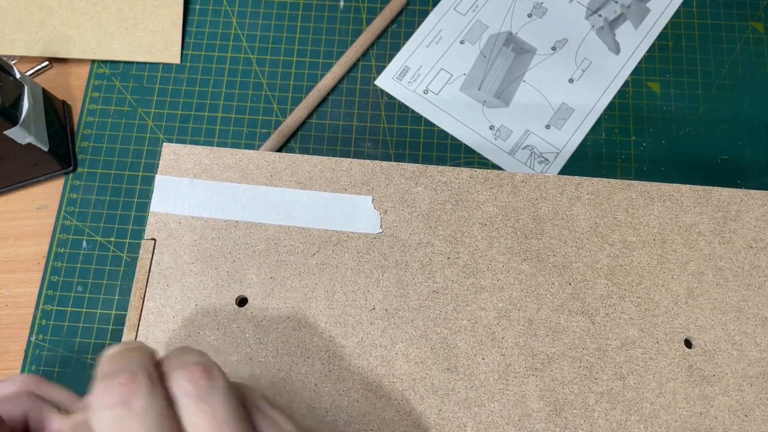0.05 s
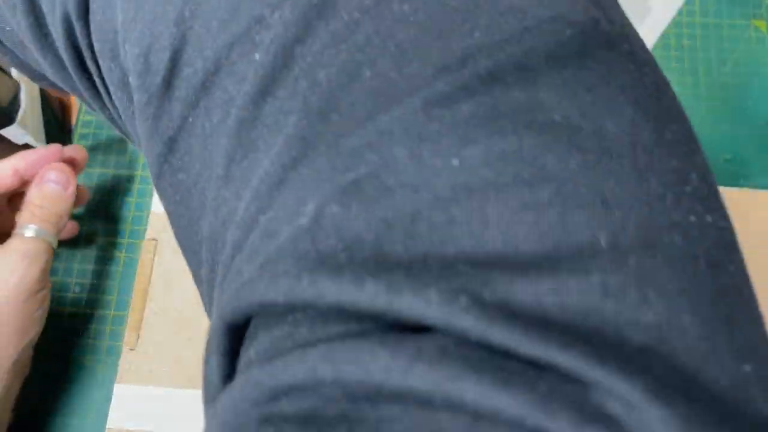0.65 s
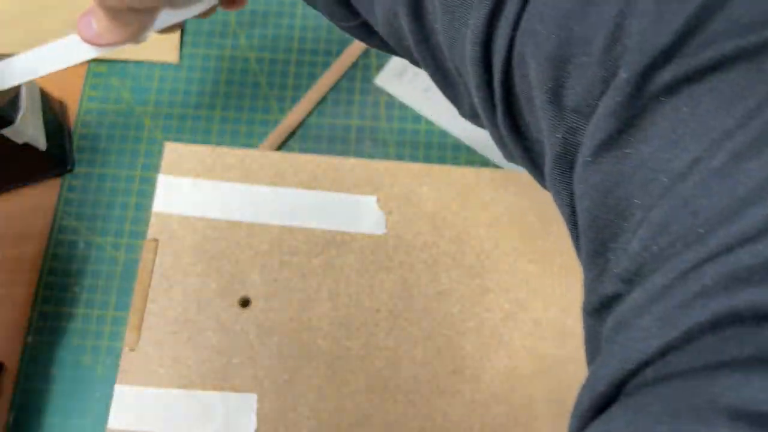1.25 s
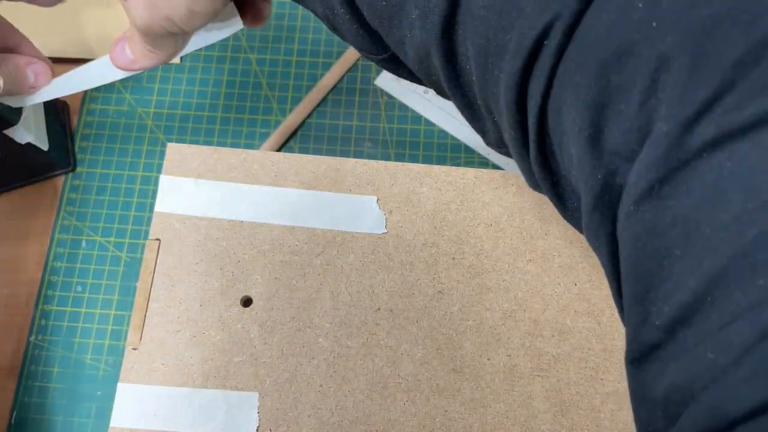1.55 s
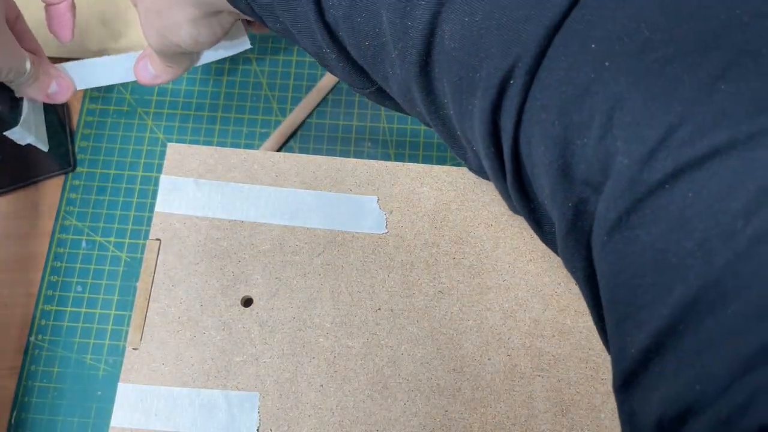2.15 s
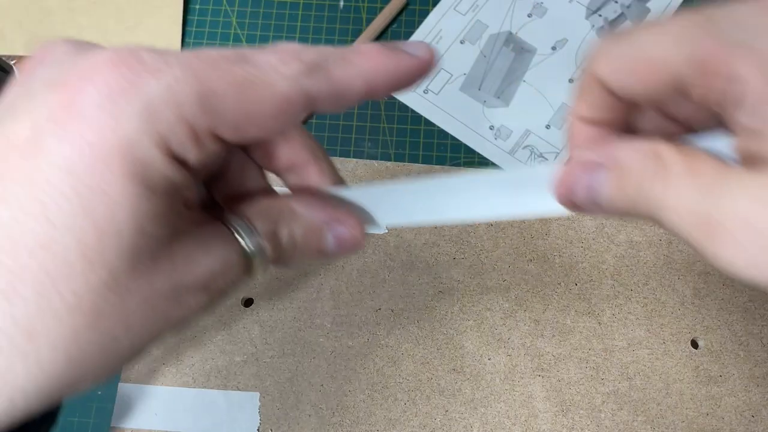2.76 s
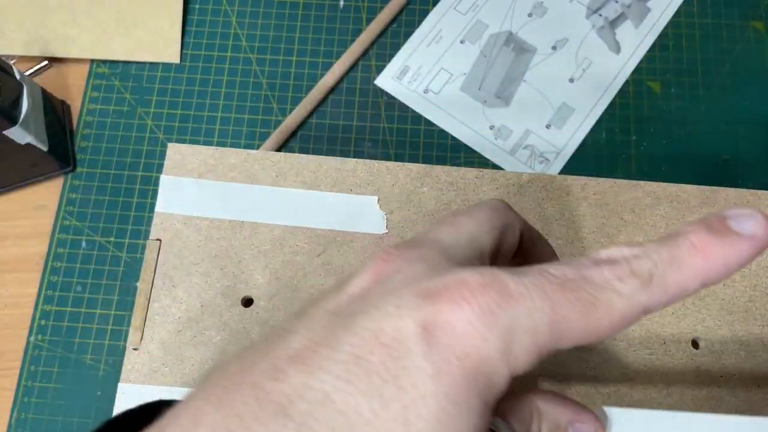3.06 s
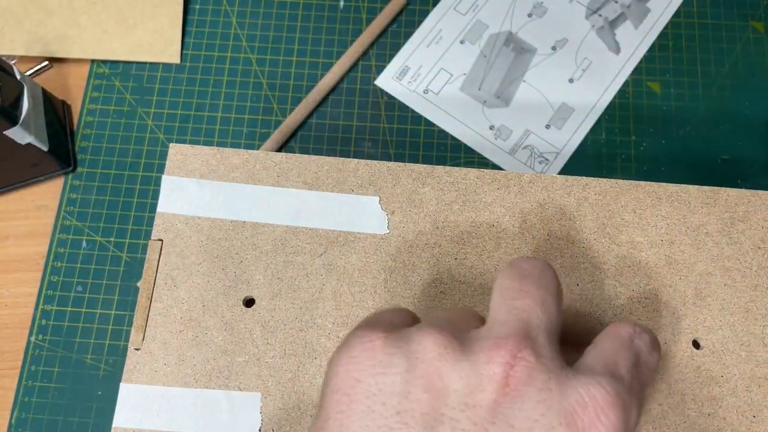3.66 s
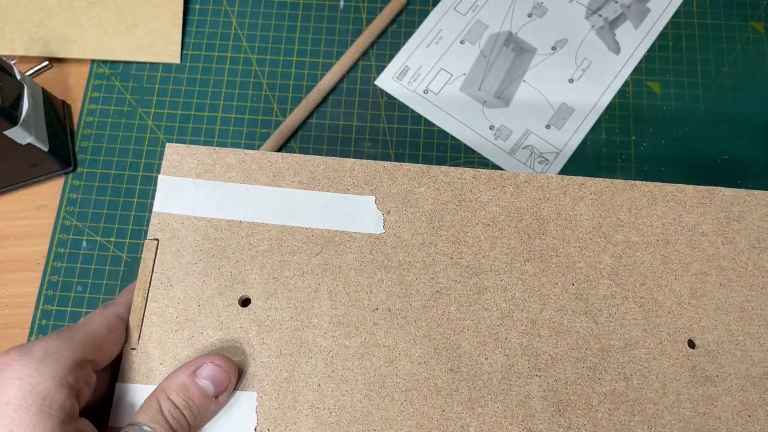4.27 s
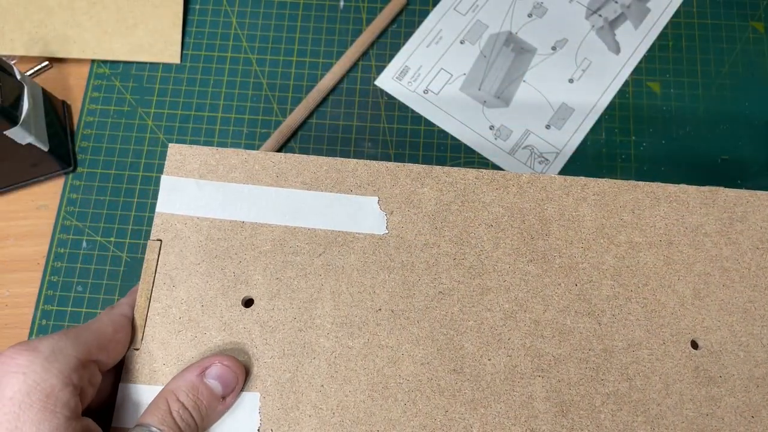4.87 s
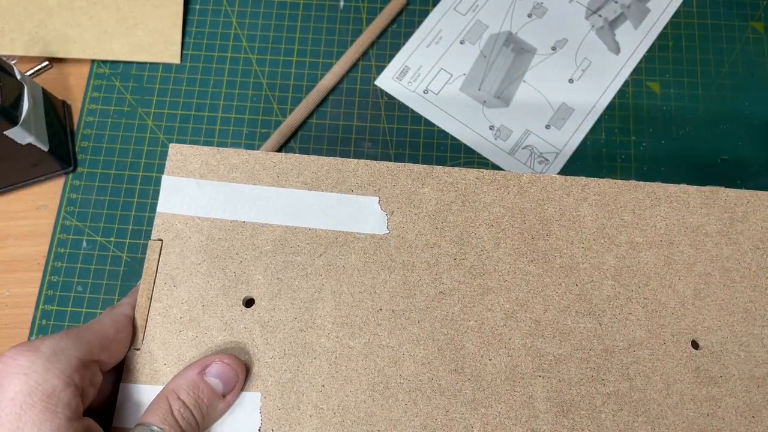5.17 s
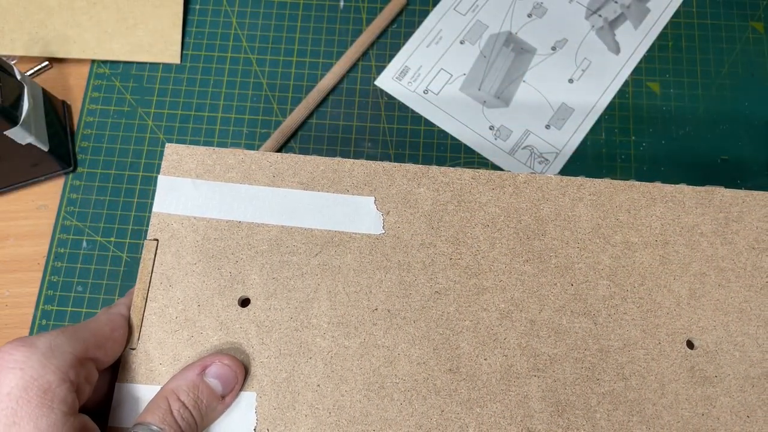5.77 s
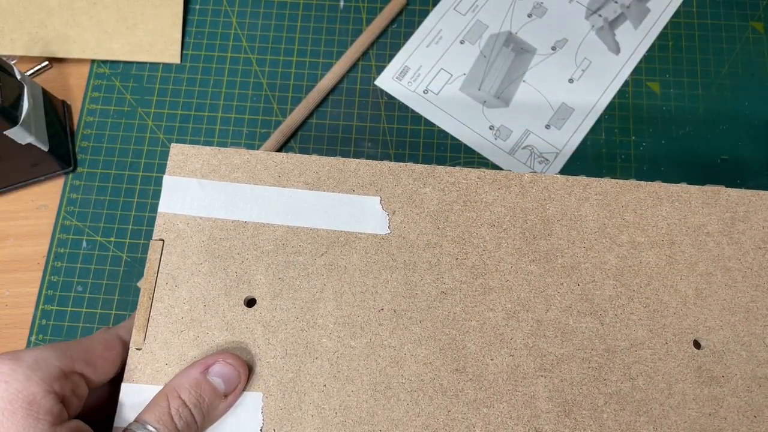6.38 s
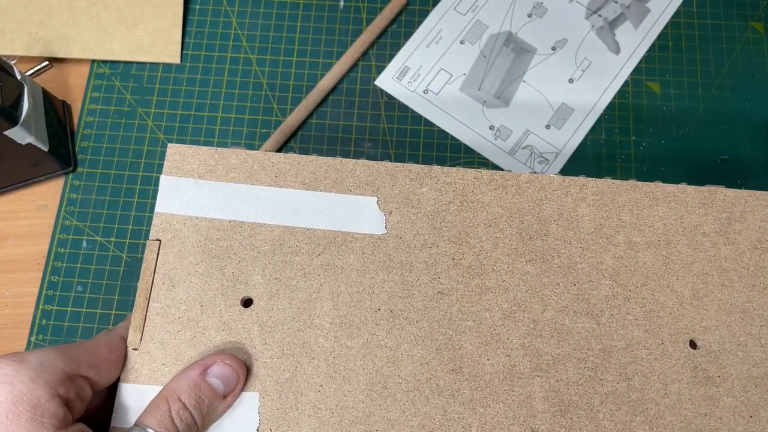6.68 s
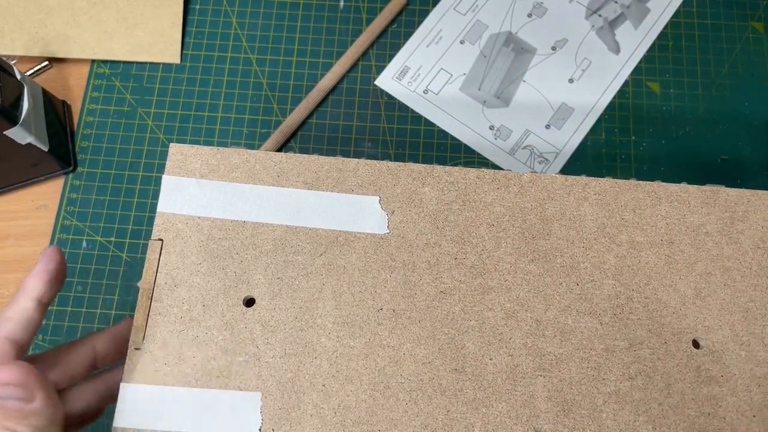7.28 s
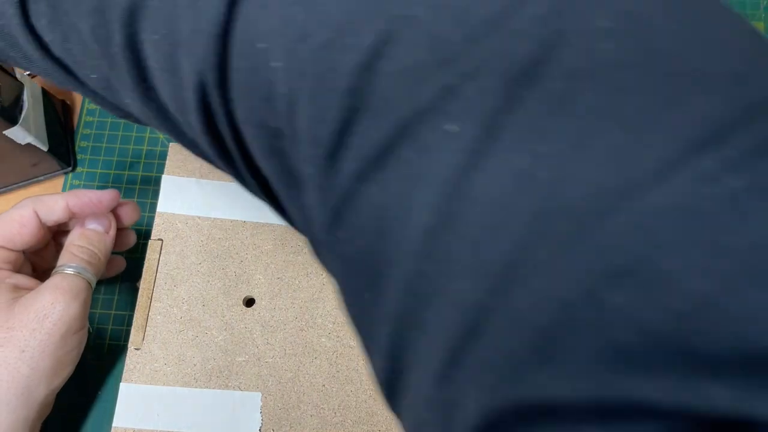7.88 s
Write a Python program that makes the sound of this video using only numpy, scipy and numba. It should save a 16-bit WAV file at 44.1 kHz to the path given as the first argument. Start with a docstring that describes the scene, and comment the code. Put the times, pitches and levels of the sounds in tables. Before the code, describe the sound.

Close, crackly peeling and snapping of masking tape, followed by light knocks on a wooden board and faintly squeaky thumb rubbing.

```python
"""Masking tape is peeled off its roll, torn off, snapped taut and rubbed onto a thin wooden panel on a desk.
The glue lets go in tiny bursts, paper fibres rip, the cardboard roll rings, the panel knocks and the
desk thuds. Fingernails click on the board and a sleeve brushes past the microphones.
Heard close up in a small quiet room, from a phone's stereo pair just above the work."""
import sys
import numpy as np
from scipy import signal
from scipy.fft import rfft, irfft, next_fast_len
from scipy.io import wavfile
from scipy.ndimage import uniform_filter1d, map_coordinates
from numba import njit

SR = 44100
rng = np.random.default_rng(int(sys.argv[2]) if len(sys.argv) > 2 else 0)


def generate_wav(sig):
    """Save sig (samples, or channels by samples) to the path in sys.argv[1] as 16-bit PCM at SR."""
    pcm = np.round(np.clip(np.atleast_2d(sig).T, -1, 1) * 32767).astype(np.int16)
    wavfile.write(sys.argv[1], SR, pcm)


N = 354123
T = np.arange(N) / SR

# bands in which noise levels are set: low_hz, high_hz
BASS, LOW, MID = (60, 140), (200, 700), (400, 2000)
HISS, TREBLE, ALL = (3000, 7000), (9300, 12300), (0, 16000)
# spectrum of the panel under friction: frequency_hz, level_db
PANEL_COLOUR = [(60, -30), (170, 9), (260, 2.5), (450, 3.5), (700, -12), (1000, -16.5), (2000, -18),
                (4000, -30.5), (12000, -33)]
# spectrum of the shaken desk: frequency_hz, level_db
DESK_COLOUR = [(25, -34.5), (55, -13), (78, 7), (103, 10.5), (140, -7.5), (300, -22), (1500, -61.5)]


def peel(judder_db=2.2, echo_gain=.42, rasp_db=-41.5, ring_db=-40, rumble_db=-21):
    """Glue threads break in flurries; the lengthening strip rings and buzzes and the desk rumbles."""
    # speed of the tape leaving the roll, as the level of its crackle: time_s, level_db
    peel_speed = [(.73, -70), (.75, -44.5), (.79, -40.5), (.86, -37), (.96, -36.5), (1.07, -38), (1.1, -40),
                  (1.2, -44), (1.268, -45), (1.29, -80)]
    # spectra of the parting glue and the rasping strip: frequency_hz, level_db
    glue_colour = [(200, -10), (600, -22), (1100, -15.5), (1500, -16.5), (2700, -19), (6000, -20.5),
                   (9000, -5), (11500, -3), (15000, -8.5)]
    strip_colour = [(1000, -18.5), (2700, -4.5), (3300, -5.5), (4200, -1.5), (5400, -2), (7000, 6),
                    (9000, -12.5), (15000, -34)]
    # the free strip rings lower as it lengthens: time_s, pitch_hz
    ring_pitch = [(.75, 7450), (.86, 6500), (.92, 5500), (.97, 4960), (1.03, 4040), (1.08, 3480),
                  (1.29, 2950)]
    # a lower buzz comes and goes with the strip's tension: time_s, pitch_hz, level_db
    strip_buzz = [(.85, 3700, -61), (.895, 3470, -51), (.91, 3210, -43), (.94, 3370, -50), (.96, 3610, -57),
                  (1.0, 3400, -51), (1.06, 3300, -50), (1.1, 3400, -73)]
    speed = gain_curve(peel_speed)
    effort = speed / speed.max()
    grip = undb(judder_db * wander(550))
    grip /= np.sqrt(np.mean(grip ** 2))
    lag_s = np.interp(T, [peel_speed[0][0], peel_speed[-1][0]], [.000635, .00073])

    def hollow(slips):
        """Each slip returns inverted from the held end of the strip, later as the strip grows."""
        echo = map_coordinates(slips, [(T - lag_s) * SR], order=3)
        return (slips - echo_gain * echo) / np.hypot(1, echo_gain)

    glue_slips = hollow(grip * crackle(rate_hz=2600, spread_db=2.5, decay_s=.0004))
    glue = coloured(glue_slips, glue_colour, TREBLE) * speed
    strip_slips = hollow(grip * crackle(rate_hz=2700, spread_db=1, decay_s=.00054))
    strip = coloured(strip_slips, strip_colour, HISS)
    ring = resonance(strip, np.interp(T, *np.transpose(ring_pitch)), width_hz=900.)
    time_s, buzz_hz, buzz_db = np.transpose(strip_buzz)
    buzz = resonance(strip, np.interp(T, time_s, buzz_hz), width_hz=290.)
    rasp = strip * undb(rasp_db) * effort ** 1.14 + ring * undb(ring_db) * effort ** 2.6
    rasp += buzz / buzz.std() * gain_curve(np.column_stack([time_s, buzz_db]))
    rumble = desk_rumble() * speed * undb(rumble_db)
    return place(glue, pan_db=4.5, lead_s=.00012) + place(rasp, pan_db=-3, lead_s=-.000038) + rumble


def rips():
    """Paper fibres part in quick runs until the tape gives way; gentle tugs swell and fade."""
    # short rips of paper and glue: start_s, length_s, level_db, rise_db
    tears = [(0.611, 0.056, -45.5, 20.5), (0.74, 0.063, -37.5, -1), (1.293, 0.025, -53, 15),
             (1.347, 0.018, -59, -1.5), (2.089, 0.043, -41, 0.5), (2.508, 0.025, -51, 8),
             (2.841, 0.04, -41.5, 16), (7.964, 0.073, -42.5, 3)]
    # tugs that free a little more tape: start_s, length_s, level_db
    tugs = [(1.469, 0.096, -55.5), (1.573, 0.048, -46), (1.624, 0.11, -53.5), (1.78, 0.054, -55)]
    # spectrum of tearing paper: frequency_hz, level_db
    rip_colour = [(200, -12.5), (600, -17.5), (1500, -5.5), (2200, -8.5), (3200, -9), (6000, -8),
                  (9000, -2), (11500, 1.5), (15000, -5.5)]
    pull = np.zeros(N)
    for start_s, length_s, level_db, rise_db in tears:
        add(pull, start_s, undb(level_db + rise_db * np.linspace(-.5, .5, int(length_s * SR))))
    for start_s, length_s, level_db in tugs:
        add(pull, start_s, undb(level_db) * np.sin(np.linspace(0, np.pi, int(length_s * SR))))
    fibres = coloured(crackle(rate_hz=1100, spread_db=1, decay_s=.0013), rip_colour, ALL)
    return place(fibres * uniform_filter1d(pull, size=256), pan_db=-6, lead_s=.00002)


def snaps(decay_s=.00022, flutter_db=-21, flutter_s=.006):
    """The strip jerks taut: a sharp crack, then a brief papery flutter."""
    # single snaps of the strip: start_s, peak_db, body_db, left_minus_right_db
    jerks = [(.629, -27.5, -19, 22), (0.675, -24, 0, 14.5), (0.7455, -30, 3, 11), (.861, -23, -11, 6),
             (.882, -27.5, -17, 3), (1.067, -21.5, -9, -4), (1.147, -30, -6, 4), (1.259, -26, -2, -4),
             (1.307, -29, -1, 17), (1.35, -34.5, -8, 17), (1.894, -24, 4.5, -9.5), (2.096, -25.5, -2, 1),
             (2.121, -27, -6, 21.5), (2.1268, -22, 6, -4.5), (2.5309, -24, 3, 1), (2.804, -43, -6.5, 23),
             (2.851, -29.5, -11.5, 7), (2.868, -22.5, -5, -9), (2.878, -25, 3.5, 1), (3.0225, -1.5, 1, -7),
             (7.988, -18, -5, 9), (8.002, -21, -12, 2), (8.015, -21.5, 5, 14)]
    # spectra of the bright crack and the duller paper body: frequency_hz, level_db
    crack_colour = [(200, -34.5), (2200, -26), (3800, -11), (6000, -0.5), (9000, 12), (11500, 9),
                    (15000, 1)]
    body_colour = [(150, -29), (500, -20), (850, -7.5), (1250, 0.5), (1700, -1), (2300, -7.5), (3000, -3),
                   (5000, 3), (6500, 0.5), (10000, -14), (15000, -16.5)]
    out, t = np.zeros((2, N)), T[:2048]
    envelope = np.exp(-t / decay_s) + undb(flutter_db) * np.exp(-t / flutter_s)
    bright, dull = response(crack_colour), response(body_colour)
    for start_s, peak_db, body_db, pan_db in jerks:
        crack = signal.fftconvolve(burst(envelope), bright + undb(body_db) * dull)
        add(out, start_s, panned(at_peak(crack, peak_db), pan_db))
    return out


def rubbing(attack_s=.028, release_s=.029, squeak_split_hz=95, grain_db=1):
    """Skin catches on crepe paper: it hisses, squeaks on two close resonances and stirs the panel."""
    # a thumb presses the tape down: start_s, length_s, panel_db, squeak_db, hiss_db, change_db
    rubs = [(5.64, 0.024, -67, -79, -61, -4), (5.688, 0.15, -58.5, -59.5, -64.5, 4),
            (5.86, 0.09, -61, -59.5, -68, 11), (5.935, 0.098, -67.5, -56.5, -65.5, -8.5),
            (5.98, 0.12, -68, -81, -74, 2), (6.415, 0.13, -78.5, -80, -69.5, 1),
            (6.558, 0.14, -70.5, -69.5, -59.5, -15), (6.7, 0.058, -77, -79, -76.5, 3.5),
            (6.82, 0.26, -79.5, -88.5, -85.5, -14), (6.987, 0.14, -65, -68.5, -66.5, 1.5),
            (7.13, 0.15, -62, -69.5, -69, 2), (7.3, 0.11, -67.5, -71, -85, -6)]
    # the squeak sinks as the thumb leaves the panel: time_s, pitch_hz
    squeak_pitch = [(5.7, 1520), (5.95, 1430), (6.6, 1506), (7.02, 1476), (7.35, 980)]
    # spectra of the rubbed panel and the skin's hiss: frequency_hz, level_db
    body_colour = [(100, 3.5), (450, 14.5), (680, 4.5), (850, 5.5), (1000, -2), (1120, -11), (1550, -8.5),
                   (2200, -31), (6000, -56)]
    hiss_colour = [(400, -5), (850, 8.5), (1150, -6), (2200, -2.5), (3000, 6.5), (3900, 0), (5000, 5.5),
                   (7000, 8), (10000, 10), (12500, 4.5), (15000, 0)]
    # resonances of the rubbed tape and panel: pitch_hz, width_hz, level_db
    rub_modes = [(860, 58, 8.5), (2140, 290, -1), (2875, 150, -5.5), (3955, 200, 3.5), (4530, 300, 2)]
    panel_gain, squeak_gain, hiss_gain = (strokes(rubs, attack_s, release_s, k) for k in (2, 3, 4))
    catches = crackle(rate_hz=1100, spread_db=1.5, decay_s=.0034)
    slips = crackle(rate_hz=4600, spread_db=5, decay_s=.00066)
    pitch_hz = np.interp(T, *np.transpose(squeak_pitch))
    squeak = sum(steep_band(slips, pitch_hz + side * squeak_split_hz, width_hz=150.) for side in (-1, 1))
    body = coloured(catches, body_colour, LOW) * panel_gain + squeak / squeak.std() * squeak_gain
    grain = roaming(crackle(rate_hz=640, spread_db=5.5, decay_s=.0021), rub_modes) * undb(grain_db)
    hiss = (coloured(catches, hiss_colour, HISS) + grain) / np.hypot(1, undb(grain_db)) * hiss_gain
    return place(body, pan_db=-2.5, lead_s=-.00018) + place(hiss, pan_db=-5.5, lead_s=-.000035)


def roaming(x, modes, rate_hz=11, swell_db=4, drift=.02):
    """Resonances that swell, fade and drift as the point of contact moves; rms 1."""
    out = np.zeros(N)
    for pitch_hz, width_hz, level_db in modes:
        ring = resonance(x, pitch_hz * (1 + drift * wander(rate_hz)), float(width_hz))
        out += ring * undb(level_db + swell_db * wander(rate_hz))
    return out / out.std()


def roll_knocks():
    """The cardboard roll rings when bumped, close to the left microphone."""
    # blows on the roll: start_s, peak_db, contact_s
    blows = [(1.894, -37.5, 0.00015), (2.105, -40, 0.00036), (2.1205, -39, 0.00014), (2.126, -24, 0.000078),
             (2.132, -32, 0.00013), (2.147, -42.5, 0.00009), (7.971, -50, .00017), (7.989, -40, 0.00023),
             (8.0145, -47, 0.00011)]
    # modes of the roll: pitch_hz, level_db, t60_s
    modes = [(495, -29, .05), (1230, -21, .012), (1870, -6, .014), (1935, 0, .025), (2080, -5, .011),
             (2525, -22, .02)]
    return place(knocks(blows, modes), pan_db=6, lead_s=.00003)


def panel_knocks(tap_db=-17, tap_decay_s=.0034):
    """A fingertip meets the thin panel: a short woody crack ahead of each ring."""
    # blows on the panel: start_s, peak_db, contact_s
    blows = [(2.877, -37.5, 0.00087), (3.022, -42, 0.0021), (3.101, -49, 0.00077), (3.5445, -30.5, .00025),
             (4.5375, -28.5, 0.0026), (5.351, -47, 0.0025), (5.393, -45.5, 0.0019), (5.514, -40, 0.00044),
             (5.5175, -40.5, 0.0017), (6.15, -51.5, 0.0017), (7.878, -41.5, 0.00035)]
    # modes of the panel: pitch_hz, level_db, t60_s
    modes = [(191, -21, 0.1), (245.7, 0, 0.017), (366, 3, .015), (400, -10, 0.039), (460, -18, 0.099),
             (590, -2.5, 0.0091), (855, -2, 0.025), (1115, -10.5, .015), (1484, -5.5, 0.011),
             (2347, -13, 0.028), (3496, 2, 0.028), (3900, -7, .025), (4670, -9, .02)]
    # spectrum of the fingertip's crack: frequency_hz, level_db
    tap_colour = [(200, -3.5), (500, -2), (850, 1.5), (1400, -8.5), (2200, -18), (4000, -21),
                  (12000, -33.5)]
    out, t = knocks(blows, modes), T[:2048]
    for start_s, peak_db, _ in blows:
        noise = np.exp(-t / tap_decay_s) * rng.standard_normal(len(t))
        crack = signal.fftconvolve(noise, response(tap_colour))
        add(out, start_s, at_peak(crack, peak_db + tap_db))
    return place(bend(out), pan_db=-2, lead_s=.0002)


def bend(x, lag_s=.0008, at_hz=1000):
    """Bending waves cross the thin panel: the lower the pitch, the later it arrives."""
    size = next_fast_len(N + 4096)
    freqs = np.arange(size // 2 + 1) * SR / size
    cycles = 2 * lag_s * np.sqrt(freqs * at_hz)
    return irfft(rfft(x, size) * np.exp(-2j * np.pi * cycles), size)[:N]


def desk_thuds():
    """The desk booms alike in both microphones, its pitch lowered by the hand's weight."""
    # blows on the desk: start_s, peak_db, contact_s, pitch_factor
    blows = [(.625, -52.5, 0.016, 0.8), (.772, -37.5, 0.0018, 0.96), (1.175, -43, .006, 0.98),
             (1.908, -55.5, 0.0016, .8), (2.105, -44, 0.0014, 0.85), (2.143, -42.5, .006, 0.91),
             (3.125, -47, .0017, 0.92), (3.554, -43, 0.0043, 0.96), (5.522, -31, 0.002, 0.92),
             (6.165, -42.5, 0.0072, 0.92), (6.35, -60, 0.0039, 0.74), (6.445, -49, 0.003, 0.79),
             (7.0, -56, .0033, 0.88)]
    # modes of the desk: pitch_hz, level_db, t60_s
    modes = [(66, -12, .14), (90, -1, .15), (106, 3, .18), (172, -22, .1)]
    return knocks(blows, modes)


def nails(decay_s=.0008, scrape_db=-15, scrape_s=.013):
    """A nail clicks on hard board and skids briefly: duller than the snap of the tape."""
    # a nail catches the panel or the tape on it: start_s, peak_db, left_minus_right_db
    clicks = [(3.5457, -23, -9), (4.510, -47.5, -12), (5.026, -40, -4), (5.516, -29, 7.5),
              (5.529, -35.5, -20), (5.647, -37, 12.5), (6.573, -43, 3), (7.879, -38, -10)]
    # spectrum of the click: frequency_hz, level_db
    nail_colour = [(200, -8), (800, -17.5), (1400, -6.5), (2600, -5.5), (3500, -5), (5500, 4.5),
                   (7500, 1.5), (11000, 4.5), (15000, -5.5)]
    out, t = np.zeros((2, N)), T[:1024]
    envelope = np.exp(-t / decay_s) + undb(scrape_db) * np.exp(-t / scrape_s)
    for start_s, peak_db, pan_db in clicks:
        click = signal.fftconvolve(burst(envelope), response(nail_colour))
        add(out, start_s, panned(at_peak(click, peak_db), pan_db))
    return out


def panel_shifts(attack_s=.0039, release_s=.015):
    """The panel judders over the mat and shakes the desk."""
    # pushes on the panel: start_s, length_s, panel_db, rumble_db, change_db
    shifts = [(1.19, 0.163, -75.5, -52, -9.5), (3.098, 0.058, -48.5, -54, 1), (3.18, .17, -60, -53, -10),
              (5.255, 0.054, -67, -75, -8), (5.348, 0.08, -62.5, -56, 7.5), (5.485, 0.044, -64, -60.5, 6),
              (6.145, 0.06, -61, -51.5, -7), (7.782, 0.095, -62.5, -55.5, -4.5),
              (7.872, 0.092, -63, -55, -6), (7.95, 0.12, -59.5, -51.5, 0)]
    slips = crackle(rate_hz=790, spread_db=10, decay_s=.004)
    judder = coloured(slips, PANEL_COLOUR, LOW) * strokes(shifts, attack_s, release_s)
    rumble = desk_rumble() * strokes(shifts, 2 * attack_s, release_s, level_column=3)
    return place(judder, pan_db=1, lead_s=.00021) + rumble


def desk_rumble():
    """Low noise of the shaken desk under the microphones."""
    return coloured(rng.standard_normal(N), DESK_COLOUR, BASS)


def roll_drag():
    """The hollow roll drags over the mat as it is picked up, off to the left."""
    # the drag: start_s, length_s, level_db, change_db
    drag = [(.385, 0.22, -57.5, 2)]
    # spectrum of the sliding roll: frequency_hz, level_db
    drag_colour = [(80, -8), (300, -9), (500, 2), (700, -9.5), (1200, -16), (1800, -23), (2120, -5.5),
                   (2600, -38), (5000, -22), (15000, -35)]
    scrape = coloured(rng.standard_normal(N), drag_colour, LOW)
    return place(scrape * strokes(drag, attack_s=.096, release_s=.36), pan_db=7, lead_s=.00025)


def crinkles():
    """The loose strip crinkles as fingers flex it."""
    # flexes of the strip: start_s, length_s, level_db, change_db
    flexes = [(.6, 0.13, -61, 5), (1.28, 0.15, -65, -25), (1.56, 0.18, -59, 5.5), (1.78, 0.17, -68.5, -6),
              (2.057, 0.023, -66.5, 17.5), (2.14, 0.13, -66.5, 4.5), (2.36, 0.55, -67, 4),
              (2.955, 0.062, -59, 13.5), (3.05, 0.087, -62, -6.5), (3.26, 0.032, -68.5, -13),
              (3.58, 0.096, -79.5, 27)]
    # spectrum of creasing tape: frequency_hz, level_db
    crinkle_colour = [(300, -25), (1500, -13), (3500, -7.5), (6000, -5), (9000, -3), (12000, 0.5),
                      (15000, -7)]
    creases = coloured(crackle(rate_hz=1000, spread_db=3, decay_s=.0026), crinkle_colour, TREBLE)
    return place(creases * strokes(flexes, attack_s=.0078, release_s=.012), pan_db=-3, lead_s=-.000037)


def finger_glides(panel_db=-7):
    """A fingertip glides lightly over the tape and stirs the panel beneath."""
    # light strokes: start_s, length_s, level_db, change_db
    glides = [(3.96, 0.12, -70.5, 3), (4.2, 0.23, -73, -9), (4.31, .11, -67.5, -7.5), (4.44, 0.14, -77, 6),
              (4.88, 0.154, -74, 12), (5.015, 0.052, -63, -1), (5.09, 0.017, -72, 0)]
    # spectrum of skin on tape: frequency_hz, level_db
    glide_colour = [(500, -17), (2000, -12.5), (3500, -7.5), (6000, 0), (8500, 4.5), (12000, -5),
                    (15000, -8)]
    catches = crackle(rate_hz=6300, spread_db=6.5, decay_s=.0027)
    touch = strokes(glides, attack_s=.021, release_s=.016)
    finger = coloured(catches, glide_colour, TREBLE) * touch
    panel = coloured(catches, PANEL_COLOUR, LOW) * touch * undb(panel_db)
    return place(finger, pan_db=-3, lead_s=-.000037) + place(panel, pan_db=1.5, lead_s=.00012)


def sleeve():
    """Sleeve and hand brush past, close to the microphones."""
    # passes of the arm: start_s, length_s, level_db, change_db
    brushes = [(0, 0.22, -67.5, 9), (.36, 0.21, -72.5, 20), (1.36, 0.23, -68.5, 14),
               (1.6, 0.34, -68.5, 4.5), (2.27, 0.25, -61, 4.5), (2.54, 0.22, -74.5, -32),
               (3.33, 0.194, -70, 14.5), (3.56, 0.54, -73, 2), (7.25, 0.14, -76.5, -12),
               (7.55, 0.24, -88, 9.5)]
    # spectrum of rustling cloth: frequency_hz, level_db
    cloth_colour = [(60, -13), (250, -2), (500, -6), (1000, -5), (1500, -7), (2100, -10), (3500, -9.5),
                    (6000, -20), (11000, -35), (15000, -25)]
    cloth = coloured(crackle(rate_hz=4400, spread_db=2, decay_s=.0053), cloth_colour, MID)
    return place(cloth * strokes(brushes, attack_s=.046, release_s=.028), pan_db=1.5, lead_s=.00012)


def arm_sweep(start_s=2.5, length_s=.36, level_db=-65, start_hz=1370, end_hz=275, slowing_s=.055):
    """The sleeve slides back over the work: a smooth swish that sinks in pitch as the arm slows."""
    t = np.clip(T - start_s, 0, length_s)
    pitch_hz = end_hz + (start_hz - end_hz) * np.exp(-t / slowing_s)
    swish = steep_band(rng.standard_normal(N), pitch_hz, width_hz=330.)
    swell = undb(level_db) * np.sin(np.pi * t / length_s)
    return place(swish / swish.std() * swell, pan_db=-5, lead_s=.00018)


def room(x, early_db=-9, early_s=.021, tail_db=-13.5, t60_s=.2, treble_t60_s=.17):
    """Adds quick reflections from small things on the desk, then a short tail whose treble dies first."""
    t = T[:SR // 3]
    below_treble = signal.butter(1, 3000, fs=SR)
    short_waves, long_waves = (signal.butter(2, 700, kind, fs=SR) for kind in ("high", "low"))
    # long waves reach both microphones alike
    shared = signal.lfilter(*long_waves, rng.standard_normal(len(t)))
    out = []
    for channel in x:
        near, own = signal.lfilter(*short_waves, rng.standard_normal((2, len(t))))
        far = own + shared
        low = signal.lfilter(*below_treble, far)
        tail = low * undb(-60 * t / t60_s) + .5 * (far - low) * undb(-60 * t / treble_t60_s)
        tail *= t > .005
        early = near * np.exp(-t / early_s) * (t > .0007)
        echoes = undb(tail_db) * tail / np.linalg.norm(tail)
        echoes += undb(early_db) * early / np.linalg.norm(early)
        out.append(channel + signal.oaconvolve(channel, echoes)[:N])
    return np.array(out)


def room_tone(level_db=-71, apart=.25):
    """Faint steady air noise, mostly shared by both microphones."""
    # spectrum of the quiet room: frequency_hz, level_db
    air_colour = [(20, -16.5), (50, 2.5), (100, 1.5), (250, -9.5), (500, -17), (1000, -23.5), (2000, -31.5),
                  (6000, -31), (11000, -22), (15000, -36.5)]
    shared, left, right = (coloured(rng.standard_normal(N), air_colour, ALL) for _ in range(3))
    return undb(level_db) * (shared + apart * np.array([left, right]))


def knocks(blows, modes):
    """Each blow is a smooth push that rings the modes; a longer contact is duller."""
    out, t = np.zeros(N), T[:SR // 4]
    for start_s, peak_db, contact_s, *loading in blows:
        pitch_factor = loading[0] if loading else 1
        # neighbouring modes start in opposite directions, so the ring takes a moment to build
        ring = sum((-1) ** k * undb(db - 60 * t / t60_s) * np.cos(2 * np.pi * hz * pitch_factor * t)
                   for k, (hz, db, t60_s) in enumerate(modes))
        push = np.sin(np.pi * np.minimum(T[:512] / contact_s, 1)) ** 2
        add(out, start_s, at_peak(signal.fftconvolve(ring, push), peak_db))
    return out


def crackle(rate_hz, spread_db, decay_s):
    """Stick and slip: bursts of uneven size at random moments, each dying fast; rms 1."""
    slips = rng.random(N) < rate_hz / SR
    sizes = undb(spread_db * np.clip(rng.standard_normal(N), -2, 2))
    energy = signal.lfilter([1], [1, -np.exp(-1 / (decay_s * SR))], slips * sizes ** 2 + 1e-12)
    return np.sqrt(energy / energy.mean()) * rng.standard_normal(N)


def strokes(rows, attack_s, release_s, level_column=2):
    """Gain of hand strokes: contact builds, the pressure drifts, the hand lets go."""
    power = np.zeros(N)
    for row in rows:
        start_s, length_s, level_db, change_db = row[0], row[1], row[level_column], row[-1]
        t = T[:int((length_s + 6 * release_s) * SR)]
        contact = np.sin(np.pi / 2 * np.minimum(t / attack_s, 1)) ** 2
        pressure = undb(level_db + change_db * (np.minimum(t / length_s, 1) - .5))
        release = np.exp(-np.maximum(t - length_s, 0) / release_s)
        add(power, start_s, (contact * pressure * release) ** 2)
    return np.sqrt(power)


def burst(envelope):
    """A short crack of noise with an even spectrum."""
    noise = envelope * rng.standard_normal(len(envelope))
    power = uniform_filter1d(np.abs(rfft(noise, 2048)) ** 2, size=21)
    whitening = np.column_stack([np.linspace(1, SR / 2, len(power)), -10 * np.log10(power)])
    return signal.fftconvolve(noise, response(whitening))


def wander(rate_hz):
    """Random drift that changes course rate_hz times a second; spread near 1."""
    points = rng.standard_normal(int(N / SR * rate_hz) + 2)
    return 1.2 * np.interp(T * rate_hz, np.arange(len(points)), points)


@njit
def resonance(x, pitch_hz, width_hz):
    """State-variable band-pass whose centre moves; gain 1 at the centre."""
    out, band, low = np.empty(len(x)), 0., 0.
    for i in range(len(x)):
        tuning, damping = np.tan(np.pi * pitch_hz[i] / SR), width_hz / pitch_hz[i]
        velocity = (band + tuning * (x[i] - low)) / (1 + tuning * (tuning + damping))
        band, low = 2 * velocity - band, low + 2 * tuning * velocity
        out[i] = damping * velocity
    return out


def steep_band(x, pitch_hz, width_hz):
    """Two moving band-passes in series, the second twice as wide."""
    return resonance(resonance(x, pitch_hz, width_hz), pitch_hz, 2 * width_hz)


def response(colour, size=4096):
    """Minimum-phase impulse response with the given spectrum."""
    hz, db = np.transpose(colour)
    freqs = np.maximum(np.arange(size // 2 + 1) * SR / size, 1)
    cepstrum = irfft(np.log(undb(np.interp(np.log(freqs), np.log(hz), db))))
    cepstrum[1:size // 2] *= 2
    cepstrum[size // 2 + 1:] = 0
    return irfft(np.exp(rfft(cepstrum)))


def coloured(x, colour, band_hz):
    """Filter a white excitation of rms 1 so that it has rms 1 inside a band."""
    impulse = response(colour)
    power = np.abs(rfft(impulse)) ** 2
    freqs = np.linspace(0, SR / 2, len(power))
    in_band = (freqs >= band_hz[0]) & (freqs <= band_hz[1])
    return signal.oaconvolve(x, impulse)[:N] / np.sqrt(np.mean(power * in_band))


def gain_curve(points, fade_s=.008):
    """Gain that follows points of time_s, level_db and fades to silence around them."""
    time_s, level_db = np.transpose(points)
    gate = np.interp(T, [time_s[0] - fade_s, time_s[0], time_s[-1], time_s[-1] + fade_s], [0, 1, 1, 0])
    return undb(np.interp(T, time_s, level_db)) * gate


def place(x, pan_db, lead_s):
    """A source off to one side: the left microphone is louder by pan_db and earlier by lead_s."""
    size = next_fast_len(N + 64)
    freqs = np.arange(size // 2 + 1) * SR / size
    right = irfft(rfft(x, size) * np.exp(-2j * np.pi * freqs * lead_s), size)[:N]
    return panned(np.array([x, right]), pan_db)


def panned(x, pan_db):
    """Stereo with the left channel pan_db above the right."""
    return x * undb([[pan_db / 2], [-pan_db / 2]])


def at_peak(x, peak_db):
    """Scale a sound to a peak level."""
    return undb(peak_db) * x / np.abs(x).max()


def add(out, start_s, sound):
    """Mix a sound in at a time."""
    i = int(start_s * SR)
    out[..., i:i + sound.shape[-1]] += sound[..., :N - i]


def undb(db):
    """Decibels to gain."""
    return 10 ** (np.asarray(db) / 20)


def scene():
    """Tape, hands and wood in the room; the roll knocks close to the microphones, so it sounds drier."""
    wood = panel_knocks() + desk_thuds()
    roll, roll_room_share = roll_knocks(), .3
    tape = peel() + rips() + snaps() + crinkles()
    hands = finger_glides() + sleeve() + roll_drag() + arm_sweep() + rubbing() + panel_shifts() + nails()
    return room(tape + hands + wood + roll_room_share * roll) + (1 - roll_room_share) * roll + room_tone()


def record(dry):
    """The phone feeds one treble signal to both channels, out of step, and cuts deep bass and the top."""
    # lag of the right channel's treble: frequency_hz, lag_cycles
    treble_lag = [(7200, .15), (7900, .42), (8500, .5), (10500, 1), (11200, 1), (13100, 1.5), (13600, 1.5),
                  (15100, 2), (16500, 2)]
    size = next_fast_len(N + 2048)
    left, right = rfft(dry, size)
    freqs = np.arange(len(left)) * SR / size
    hz, lag_cycles = np.transpose(treble_lag)
    share = np.interp(freqs, hz[:2], [0, 1])
    late_left = left * np.exp(-2j * np.pi * np.interp(freqs, hz, lag_cycles))
    right = np.sqrt(1 - share) * right + np.sqrt(share) * late_left
    stereo = irfft(np.array([left, right]), size)[:, :N]
    low_cut = signal.butter(2, 35, "high", fs=SR, output="sos")
    high_cut = signal.ellip(10, .2, 80, 15900, fs=SR, output="sos")
    return signal.sosfilt(high_cut, signal.sosfilt(low_cut, stereo))


dry = scene()
out = record(dry)
generate_wav(out)
```